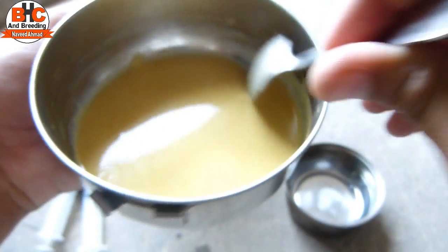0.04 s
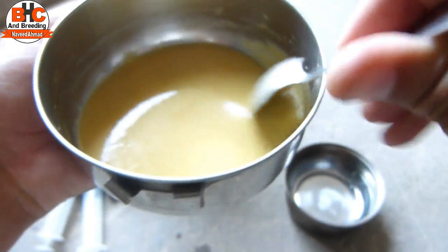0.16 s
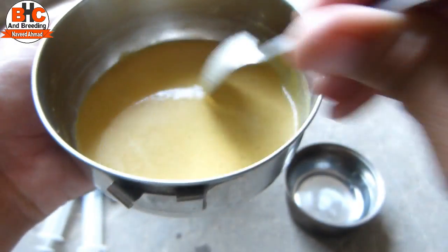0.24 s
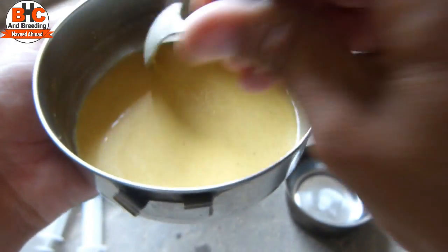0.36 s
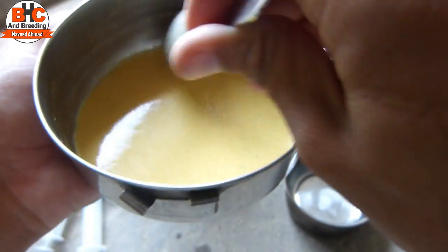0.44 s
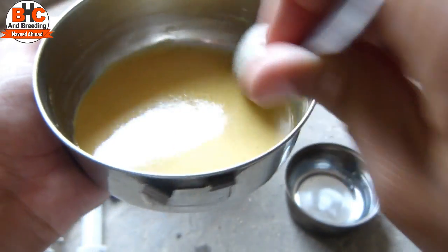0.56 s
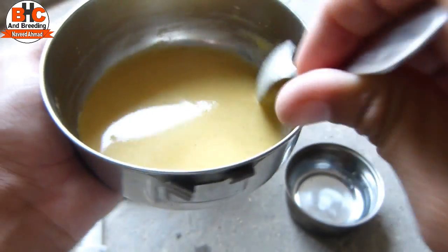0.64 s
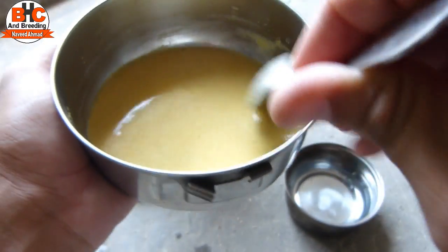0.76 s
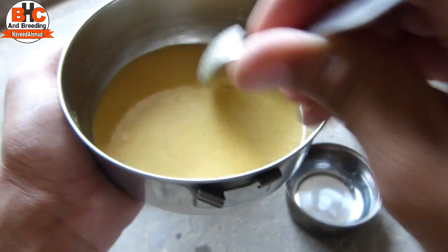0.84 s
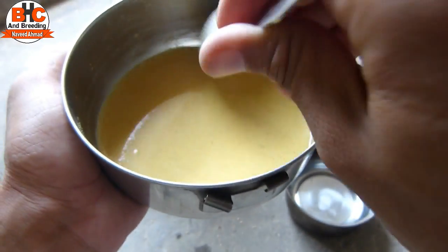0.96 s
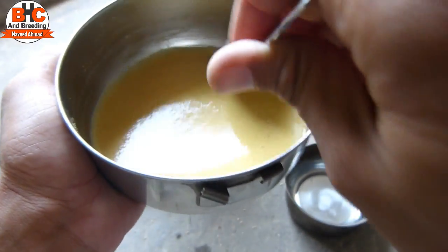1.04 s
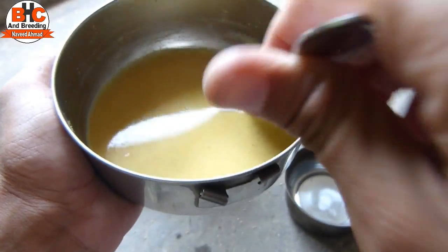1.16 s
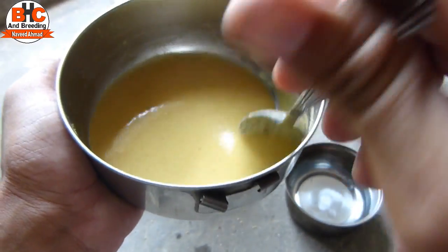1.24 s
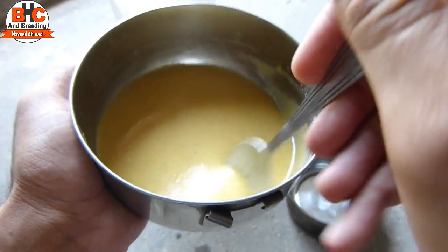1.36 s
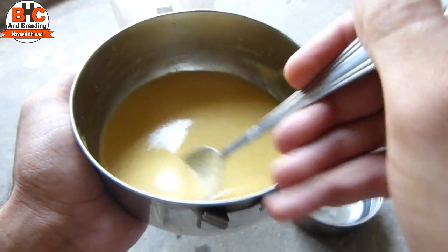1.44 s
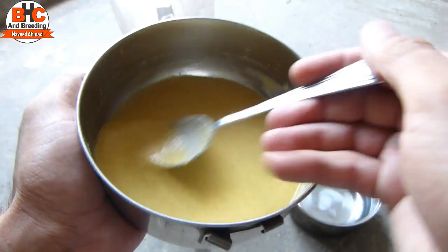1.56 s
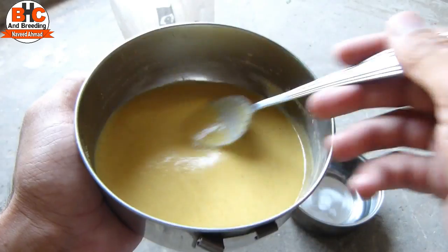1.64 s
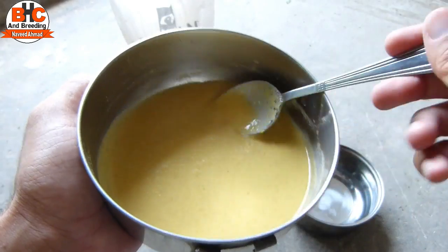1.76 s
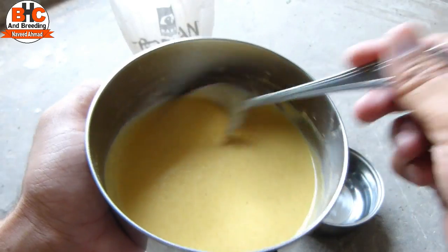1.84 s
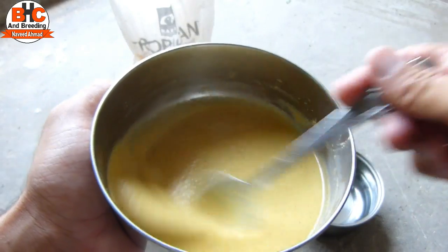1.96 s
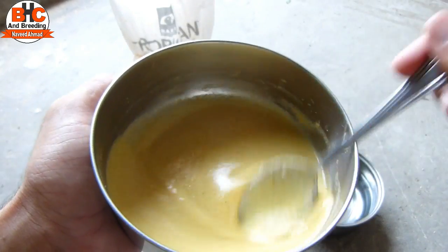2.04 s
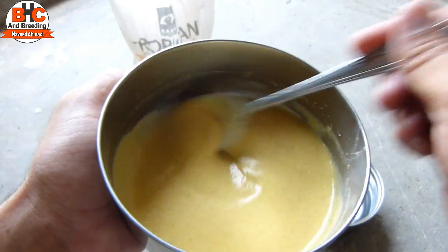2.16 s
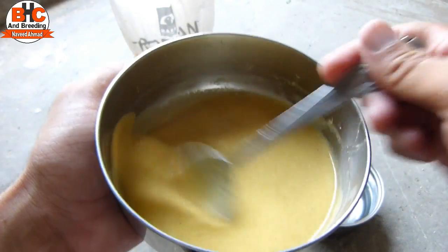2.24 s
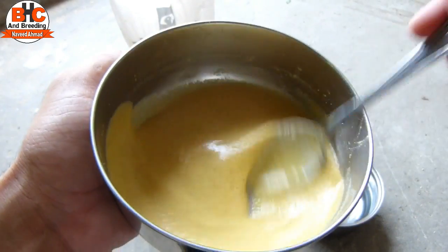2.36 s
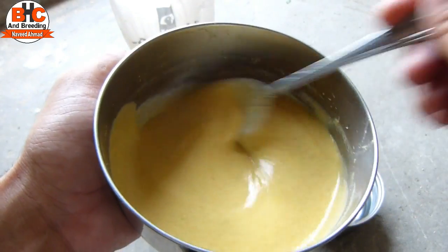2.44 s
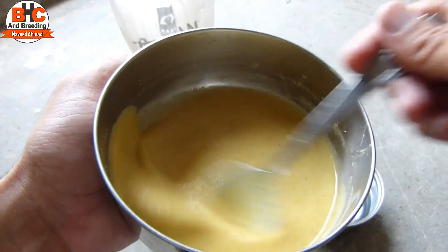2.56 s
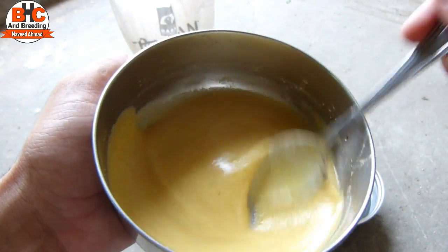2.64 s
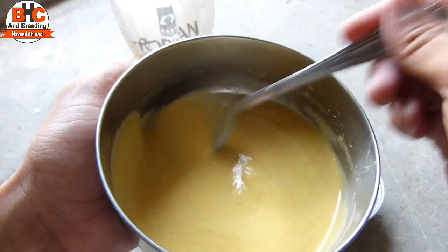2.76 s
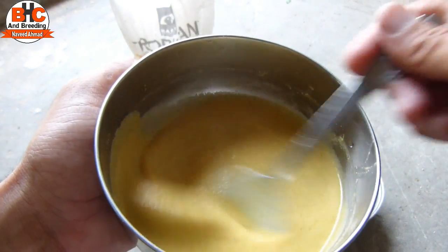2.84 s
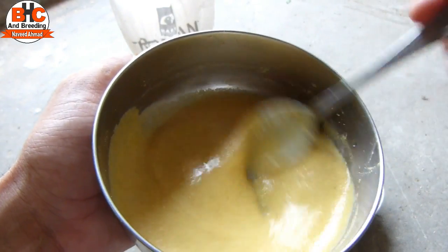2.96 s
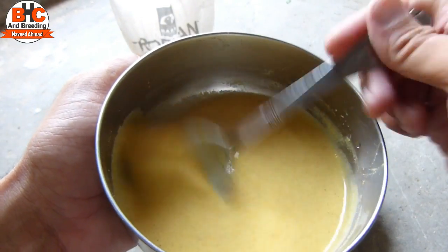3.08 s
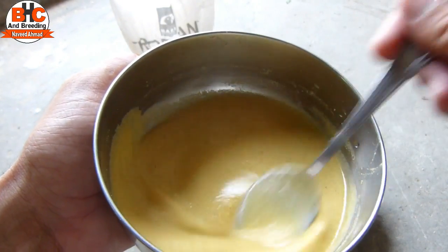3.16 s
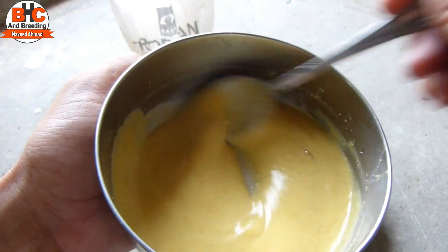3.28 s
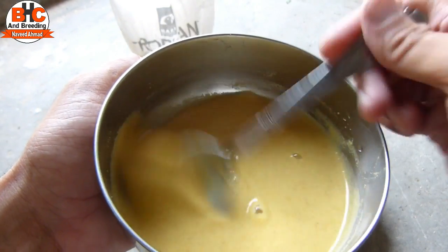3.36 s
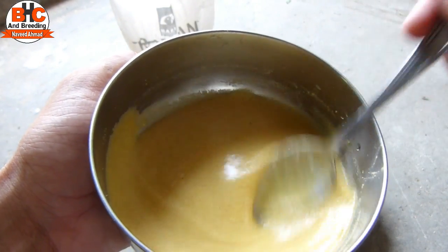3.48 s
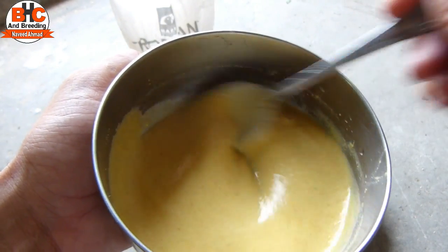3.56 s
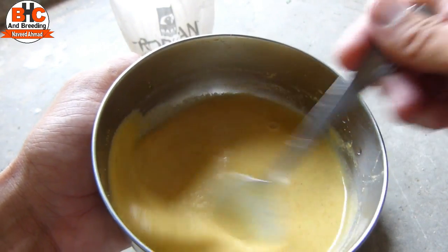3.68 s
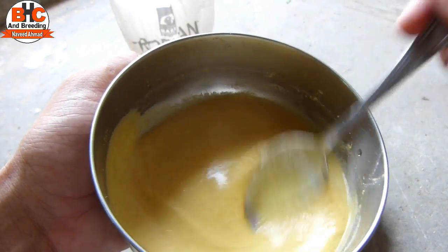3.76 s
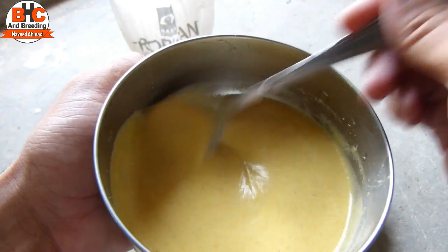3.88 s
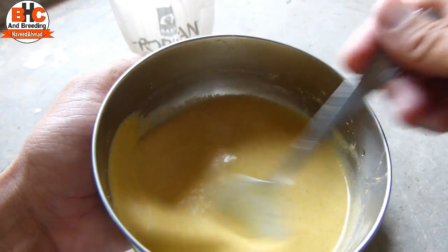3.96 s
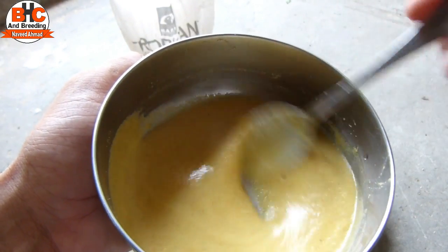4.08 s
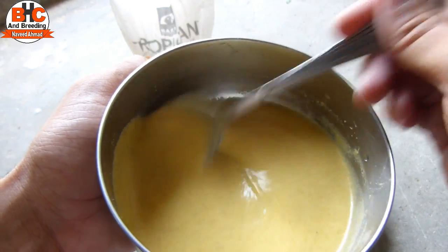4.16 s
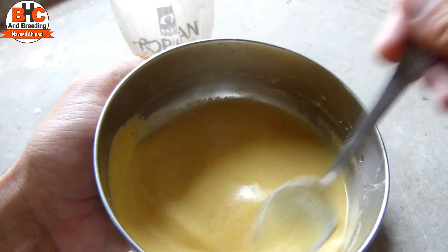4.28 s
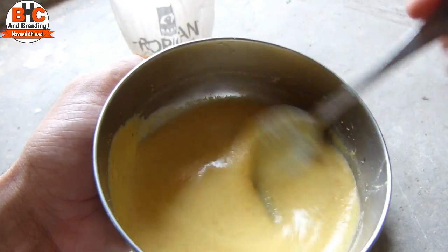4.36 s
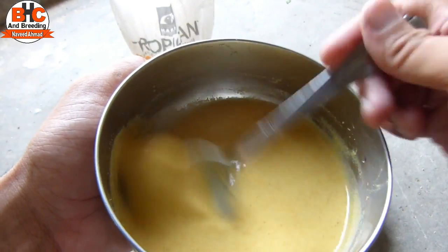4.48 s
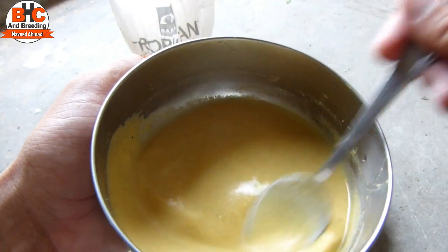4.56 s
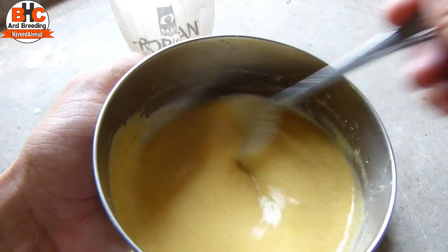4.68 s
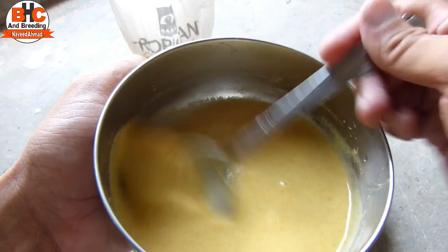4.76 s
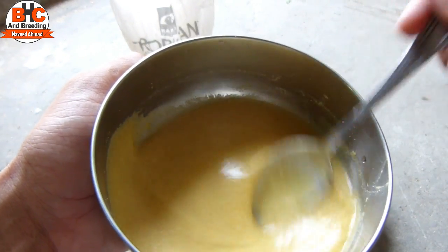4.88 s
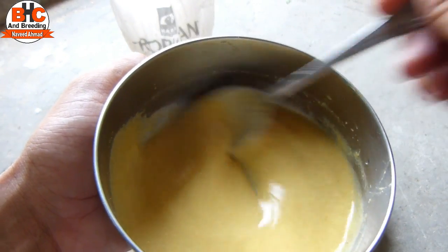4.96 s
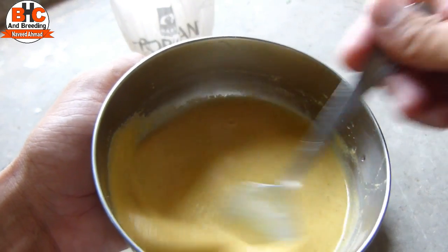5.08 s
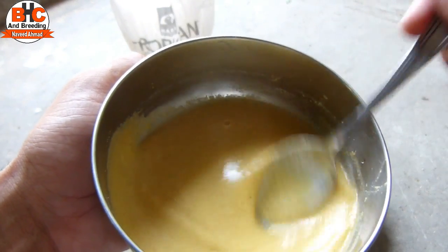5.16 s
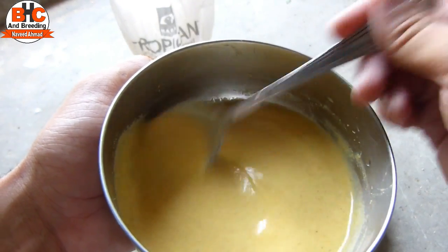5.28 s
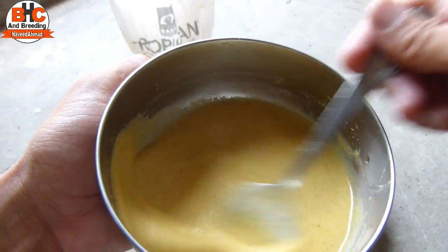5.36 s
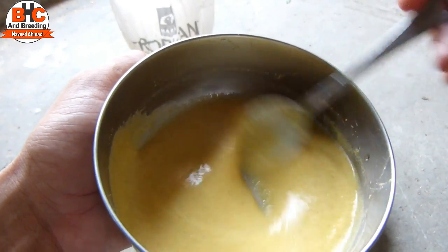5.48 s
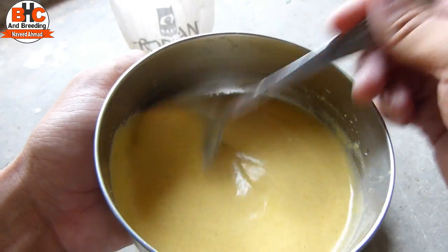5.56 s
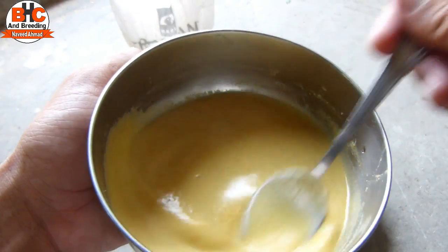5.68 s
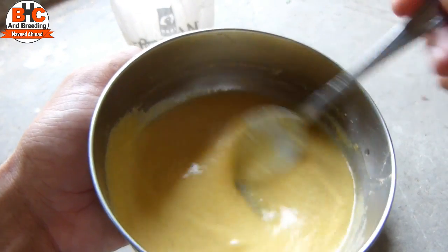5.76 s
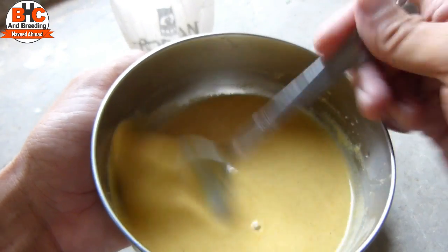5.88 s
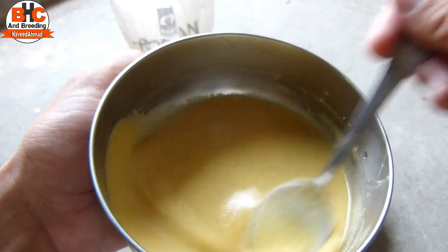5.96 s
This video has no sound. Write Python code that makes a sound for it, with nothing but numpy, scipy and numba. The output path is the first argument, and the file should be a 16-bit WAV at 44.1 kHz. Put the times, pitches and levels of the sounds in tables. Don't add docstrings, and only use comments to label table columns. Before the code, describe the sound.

A close stereo microphone hears a spoon working in a hand-held steel bowl in a small, hard room, over faint rumble and hiss. A weak low drone on the left swells and dies within the first 0.7 s. Until about 1.3 s there are light, thin wipes on the bare wall, with a tap at 0.1, a sharp bright clank at 0.43, small taps near 0.65 and a crisp tick at 0.96. A firmer scrape comes at 1.35, then a near pause. From 1.75 s a tick and ringing knock start the stirring: short gritty sweeps alternate with deeper scrapes over the bottom, mixed with irregular metallic ticks, knocks and clanks, all quickly damped. From 3.2 s it is denser and louder, with heavy scrapes near 3.3, 3.6, 5.3 and 5.8. Tiny wet plops pop through the batter, clearest at 4.66 and 5.54. Stirring continues to the end at 6 s.

```python
import sys
import numpy as np
from scipy import signal
from scipy.fft import rfft, irfft
from scipy.io import wavfile
from scipy.ndimage import uniform_filter1d
from numba import njit

SR = 44100
rng = np.random.default_rng(int(sys.argv[2]) if len(sys.argv) > 2 else 0)


def boost_factor(decibels):
    exponent = np.asarray(decibels, float) / 20
    return 10 ** exponent


def unload_wav(signal):
    wavfile.write(
        sys.argv[1],
        SR,
        np.round(np.clip(np.atleast_2d(signal).T, -1, 1) * 32767).astype(np.int16),
    )


N = 265526
HOP = 32
CHATTERS_PER_S = 100


def held(v):
    return np.repeat(v, HOP)[:N]


def walk(rate):
    hold_hops, count = int(SR / rate / HOP), N // HOP + 1
    steps = np.repeat(rng.standard_normal(count // hold_hops + 1), hold_hops)
    slewed = uniform_filter1d(uniform_filter1d(steps, hold_hops), hold_hops)
    return 1.695 * slewed[:count]


def band(x, low_hz, high_hz):
    sos = signal.butter(2, [low_hz, min(high_hz, .45 * SR)], "band", fs=SR, output="sos")
    return signal.sosfilt(sos, x) / np.sqrt(2 * (high_hz - low_hz) / SR)


@njit
def mode(x, g, k):
    y, b, l = np.empty(len(x)), 0., 0.
    for i in range(len(x)):
        v = (b + g[i] * (x[i] - l)) / (1 + g[i] * (g[i] + k))
        b, l, y[i] = 2 * v - b, l + 2 * g[i] * v, k * v
    return y


def background():
    # (frequency [Hz], density [dB per Hz])
    rumble = [(20, 3), (55, -15), (110, 0), (200, 1.5), (500, -0.5), (1200, -5), (3000, -14), (5000, -9),
              (9000, -36), (16000, -33)]
    level_db = -50
    table_hz, table_db = np.transpose(rumble)
    hz = np.maximum(np.fft.rfftfreq(N, 1 / SR), 1)
    shape = boost_factor(np.interp(np.log(hz), np.log(table_hz), table_db))
    noise = irfft(rfft(rng.standard_normal((2, N))) * shape, N)
    waver_db = 2 * np.array([held(walk(5.2)), held(walk(2.2))])
    mid, side = noise * boost_factor(waver_db)
    pair = np.array([mid + side / 2, mid - side / 2])
    return boost_factor(level_db) * pair / pair.std()


def drone():
    # (time [s], level [dB])
    drone_curve = [
        (0.0, -57),
        (0.154, -47),
        (0.29, -45.5),
        (0.352, -45.5),
        (0.7, -57),
    ]
    s, db = np.transpose(drone_curve)
    gain = boost_factor(np.interp(np.arange(N) / SR, s, db, right=-90))
    left_right = np.array([[1.3], [.6]])
    return gain * band(rng.standard_normal(N), 410, 580) * left_right


def slips():
    slips_per_s, spread_db, smear_db, chatter_db = 3000, 2, 2, 1.3
    when, size = rng.random(N), rng.exponential(size=N)
    sign = rng.choice([-1., 1.], N)
    clicks = (when < slips_per_s / SR) * sign * boost_factor(spread_db * size)
    force = clicks / clicks.std() + boost_factor(smear_db) * rng.standard_normal(N)
    force = force * boost_factor(chatter_db * held(walk(CHATTERS_PER_S)))
    return force / force.std()


def stroke(start, length, db, arch_db, lift_db_per_s):
    press_s = 0.015
    t = np.arange(0, N, HOP) / SR - start
    press = np.clip(t / press_s, 0, 1)
    lean_db = -arch_db * (2 * np.clip(t / length, 0, 1) - 1) ** 2
    lift_db = lift_db_per_s * np.maximum(t - length, 0)
    return (press * boost_factor(db + lean_db - lift_db)) ** 2


def grinding(k):
    # (start [s], length [s], pressure [dB], depth [0 wall - 1 bottom], edge tilt [dB])
    wipes = [(0, 0.057, -37, 1.56, 5.5), (0.102, 0.04, -38, 1.3, -31), (0.133, .12, -41.5, 0.98, -6),
             (0.231, 0.25, -35, 0.37, -9), (.43, 0.095, -40, 0.76, 0.5), (0.582, 0.1, -38.5, 1.43, 9),
             (.8, 0.3, -45, 0.95, -37), (0.956, 0.3, -43.5, 1.33, 12), (1.063, 0.2, -39, 0.29, 9),
             (1.197, 0.11, -36, 0.55, 2), (1.345, 0.17, -29, 0.21, 0.5), (1.751, 0.027, -44, 0.38, 7)]
    sweeps = [(1.805, 0.15, -31.5, .3, 3), (2.045, 0.028, -33.5, 0.46, -4), (2.385, 0.13, -31.5, .4, -4.5),
              (2.575, 0.15, -29, 0.19, 3.5), (2.72, 0.26, -29, 0.061, 1.5), (3.14, .12, -28, 0.079, 4),
              (3.42, 0.074, -35, 0.24, 4), (3.99, .1, -28, 0.11, 7), (4.53, 0.046, -30, 0.16, 3),
              (4.735, 0.022, -26.5, 0.91, -16), (4.86, 0.088, -27, 0.13, -2),
              (5.37, 0.16, -26.5, 0.19, 3.5), (5.69, 0.017, -39, .2, -7), (5.735, 0.055, -31, .3, -23),
              (5.772, 0.042, -21, 0.42, -2)]
    digs = [(2.085, 0.055, -32, 0.72, 5.5), (2.156, 0.13, -28, 0.65, -1.5), (2.45, 0.12, -29, 0.62, 4.5),
            (2.929, 0.083, -35.5, 1, 6), (3.017, 0.13, -28.5, 0.69, 5), (3.275, .14, -24.5, 0.4, 0.7),
            (3.508, 0.095, -30.5, 0.93, -0.5), (3.598, 0.12, -22.5, 0.48, -3), (3.775, 0.078, -25, 0.54, 0),
            (3.86, 0.13, -27.5, 0.63, 4), (4.09, .17, -26, 0.58, -5), (4.358, 0.22, -27, .6, 1.5),
            (4.618, .11, -30, 1, 1.5), (4.77, 0.069, -24, 0.51, 1.5), (4.965, 0.15, -26.5, 0.65, 2.2),
            (5.163, 0.095, -32.5, 1, 4), (5.27, 0.1, -22.5, 0.66, -4), (5.522, 0.15, -24, 0.76, -0.5),
            (5.82, .12, -22, 0.73, -4.5)]
    # share at depth 0 [dB], gain [dB per unit depth]
    wipe_db, wipe_depth_db = (-14, -14, 0.7, -1.1), (3.7, 15.3, .1, 0.093)
    stir_db, stir_depth_db = (-19, -12.5, 0.2, 1), (18, 13, 0.5, -3)
    lift_db_per_s = (350, 323, 246, 368)
    power = 0
    for rows, base_db, depth_db, arch_db in ((wipes, wipe_db, wipe_depth_db, 4),
                                             (sweeps + digs, stir_db, stir_depth_db, 4.5)):
        for s, length, db, depth, tilt_db in rows:
            fed_db = db + base_db[k] + depth * depth_db[k] + tilt_db * (k == 3)
            power = power + stroke(s, length, fed_db, arch_db, lift_db_per_s[k])
    return held(np.sqrt(power))


def knocks(k):
    # (time [s], level [dB], contact [ms])
    tap_rows = [(.019, -35, 4.9), (.1125, -11, 3.8), (.617, -22, 5.3), (.6535, -11.5, 2.6),
                (1.2276, -19.5, 5), (1.5124, -26.5, 4.2)]
    tick_rows = [(.6826, -12.5, 2.2), (.9558, 1, 3.6), (1.1515, -21, 1.1), (1.7444, 1.5, 1.67),
                 (2.0424, -5.5, 4.3), (2.195, -17, 5.6), (2.2114, -12, 4.5), (2.2633, -4, 1.8),
                 (2.387, -20, 5), (2.4114, -13, 6.4), (2.5645, 0, 2.3), (2.6939, -5.5, 5.5),
                 (2.915, -11.5, 4.7), (2.9372, -0.5, 2.4), (3.2254, -11, 18), (3.2464, -7.5, 5.3),
                 (3.5126, -4.5, 4.5), (3.7757, -17, 9), (3.8083, -6.5, 8.6), (4.0905, -3, 1.4),
                 (4.1784, -6, 3.9), (4.28, -16, 6.4), (4.372, -9, 3.9), (4.381, -7, 6.7),
                 (4.7458, -12.5, 6.1), (4.8713, -13.5, 11), (4.9312, -3, 5.3), (5.1767, -1.5, 3.2),
                 (5.631, -5.5, 2.8), (5.7763, -3.5, 1.7)]
    knock_rows = [(1.802, -8.5, 10), (1.8617, -15, 3.3), (2.0872, -14.5, 6.3), (2.1117, -5, 4.2),
                  (2.4856, -14.5, 6.4), (3.1068, -7.5, 2.7), (3.3233, -11, 3.9), (3.5396, -4.5, 3.1),
                  (3.6526, -7.5, 2.4), (3.8873, -1, 3.1), (3.9112, -8, 3.2), (4.1663, -8, 9.2),
                  (4.2229, -2.5, 2.3), (4.4386, -12, 6.6), (4.4653, -2.5, 4), (4.5173, -5, 8),
                  (4.664, -6, 1.8), (4.78, -8.5, 6.1), (4.794, -5.5, 11), (5.009, -9, 14), (5.072, -6, 2.5),
                  (5.56, -8, 2.8), (5.6167, -4.5, 5.3), (5.8513, -9, 3.7), (5.918, 0.5, 2.9)]
    clank_rows = [(.4257, 0, 0.68), (1.9536, -22.5, 6.9), (2.2842, -11, 2.8), (2.973, -4, 2.45),
                  (3.0616, -11.5, 3.2), (3.1187, -7.5, 3), (3.3934, -4.5, 1.3), (3.6069, -4, 1.8),
                  (3.6758, -7.5, 3), (3.955, -8.5, 2.3), (4.1004, -8, 3), (4.2392, -10.5, 2.7),
                  (4.6329, -9.5, 3.3), (5.2138, -8.5, 5.4), (5.2959, -14.5, 6.9), (5.3525, -7, 0.94),
                  (5.494, -3, 1.4), (5.9032, -13, 0.94)]
    kinds = ((tap_rows, (-16, -5.5, -23.5, -10)),
             (tick_rows, (-19, -17, -13.5, -3)),
             (knock_rows, (-20.5, -14.5, -5, -16.5)),
             (clank_rows, (-6.5, -9, -3.5, -6.5)))
    onset_share = .07
    force = np.zeros(N)
    t = np.arange(2000) / SR
    for rows, feed_db in kinds:
        for s, db, ms in rows:
            i, contact_s = int(s * SR), max(ms, 1) / 1000
            onset = 1 - np.exp(-t / (onset_share * contact_s))
            shape = onset * np.exp(-t / contact_s)
            force[i:i + len(t)] += boost_factor(db + feed_db[k]) * shape[:N - i]
    return force


def mode_family(force, modes, rasp, dipped):
    shift_db, fleck_db, shifts_per_s, detune = 4, 4, 12, .018
    sharpest = 32
    film_hz = 400
    gains = []
    for hz, _, bare_db, batter_db in modes:
        level_db = bare_db + dipped * (batter_db - bare_db)
        flicker_db = fleck_db * walk(hz / 70)
        gains.append(boost_factor(level_db + shift_db * walk(shifts_per_s) + flicker_db))
    total = np.sqrt(np.sum(np.square(gains), axis=0))
    low_hz, high_hz, rasp_db = rasp
    out = boost_factor(rasp_db) * band(force, low_hz, high_hz)
    for (hz, width_hz, *_), gain in zip(modes, gains):
        width_hz = max(width_hz, hz / sharpest, (hz / film_hz) ** 2)
        pitch = np.tan(np.pi * hz * (1 + detune * walk(shifts_per_s / 2)) / SR)
        ringing = mode(force * held(gain / total), held(pitch), width_hz / hz)
        out = out + ringing / np.sqrt(np.pi * width_hz / SR)
    return out


def rings():
    # (time [s], frequency [Hz], peak [dB], T60 [s])
    ring_rows = [(.427, 1400, -10.5, 0.02), (.956, 154, -29, 0.018), (1.225, 873, -33.5, 0.13),
                 (1.803, 702, -22, 0.1), (1.803, 2090, -22, 0.11), (2.044, 2150, -16, 0.021),
                 (3.12, 1360, -21, 0.037), (3.394, 2067, -17.5, 0.09), (3.394, 680, -28, 0.14),
                 (3.58, 2100, -27, .04), (4.05, 2220, -23.5, 0.12)]
    out, t = np.zeros(N), np.arange(SR // 5) / SR
    for s, hz, db, t60_s in ring_rows:
        i = int(s * SR)
        decay = np.exp(-np.log(1000) * t / t60_s)
        out[i:i + len(t)] += boost_factor(db) * np.sin(2 * np.pi * hz * t) * decay
    return out


def bowl():
    # (frequency [Hz], width [Hz], level on bare wall [dB], level in batter [dB])
    belly_modes = [(647, 200, 5, -9), (760, 95, -25, 3), (963.6, 52, 5, 19.5), (1017, 91, 3, 1.5)]
    wall_modes = [(1400, 40, -24.5, -7), (1521, 35, -30, 10.5), (1634.4, 71, 13.5, 14.5),
                  (1940, 96, 18, -43), (2133, 30, 10.5, 9.5), (2297, 245, 6, 11), (2620, 400, 11, 9),
                  (2824, 46, 6.5, 6.5), (3107, 160, 3, 13.5)]
    edge_modes = [(3500, 710, -15, -32), (4046, 180, 8.5, 4.5), (4178, 50, -22, 7.5), (4733, 270, -12, 4.5),
                  (4980, 340, 7.5, -7), (5560, 480, 0.5, 0.5), (5368, 260, -24, 11), (6150, 160, -24, -1),
                  (6452, 1300, 6, 7.5)]
    sizzle_modes = [(7100, 1100, 4, 8), (7730, 190, -3, 4), (7640, 120, -4, -11), (8350, 120, 12.5, 1.5),
                    (9370, 510, -32, -0.5), (10100, 200, -12, -13), (10850, 150, 8, -1),
                    (12800, 760, -3, -20)]
    # (low [Hz], high [Hz], level beside the modes [dB])
    rasps = [(700, 2100, -36), (1250, 5500, -14.5), (3860, 5800, -20.5), (5940, 9800, -15.5)]
    dip_s, dip_length_s, own_chatter_db = 1.33, 0.017, 1.9
    lowest_hz = 641
    thud_db, thud_hz = -18.5, (163, 570)
    jolt_db, jolt_hz = -35, (35, 223)

    grit, rattle = slips(), rng.standard_normal(N)
    dipped = np.clip((np.arange(0, N, HOP) / SR - dip_s) / dip_length_s, 0, 1)
    forces, steel = [], 0
    for k, modes in enumerate((belly_modes, wall_modes, edge_modes, sizzle_modes)):
        own_chatter = boost_factor(own_chatter_db * held(walk(CHATTERS_PER_S / 2)))
        force = grit * grinding(k) * own_chatter + rattle * knocks(k)
        steel = steel + mode_family(force, modes, rasps[k], dipped)
        forces.append(force)
    steel = signal.sosfilt(signal.butter(6, lowest_hz, "high", fs=SR, output="sos"), steel)
    thud = boost_factor(thud_db) * band(forces[0], *thud_hz)
    jolt = boost_factor(jolt_db) * band(forces[2], *jolt_hz)
    return steel + thud + jolt + rings()


def batter():
    # (time [s], start [Hz], end [Hz], length [s], level [dB])
    plops = [
        (1.225, 1120, 1250, 0.015, -31),
        (2.421, 902, 760, 0.049, -31),
        (2.85, 1130, 1400, 0.01, -24),
        (2.975, 1250, 1500, 0.015, -24),
        (4.66, 1142, 1400, 0.012, -15),
        (5.08, 1097, 1290, 0.04, -28.5),
        (5.225, 912, 690, 0.104, -26.5),
        (5.54, 845, 1860, 0.029, -16.5),
        (5.81, 822, 700, 0.086, -25.5),
    ]
    out = np.zeros(N)
    for s, start_hz, end_hz, length_s, db in plops:
        i = int(s * SR)
        u = np.arange(int(length_s * SR)) / (length_s * SR)
        hz = start_hz * (end_hz / start_hz) ** u
        tone = np.sin(2 * np.pi * np.cumsum(hz) / SR)
        out[i:i + len(u)] += boost_factor(db) * 3 * tone * np.sqrt(u) * (1 - u) ** 2
    return out


def tail(t60_s, top_hz):
    t = np.arange(int(.6 * SR)) / SR
    h = rng.standard_normal((2, len(t))) * np.exp(-np.log(1000) * t / t60_s)
    h = signal.lfilter([1], [1, -np.exp(-2 * np.pi * top_hz / SR)], h)
    return h / np.sqrt(np.sum(h ** 2, axis=1, keepdims=True))


def scene():
    side_db, left_db, hands_per_s = -11.5, 0.8, 8
    room_t60_s, room_db, room_top_hz = 0.3, -10.5, 8900
    steel = bowl() + batter()
    bright = signal.lfilter([1, -.4], 1, steel)
    near = signal.fftconvolve(bright[None], tail(0.0057, 22000), axes=1)[:, :N]
    turn = held(np.pi * walk(hands_per_s))
    side = boost_factor(side_db) * (near[0] * np.cos(turn) + near[1] * np.sin(turn))
    room = signal.fftconvolve(steel[None], tail(room_t60_s, room_top_hz), axes=1)[:, :N]
    ports = np.array([[1], [-1]])
    direct = (steel + side * ports) * boost_factor(left_db * ports / 2)
    return direct + boost_factor(room_db) * room + background() + drone()


def low_pass(x):
    return signal.sosfilt(signal.butter(12, 16840, fs=SR, output="sos"), x)


def record(dry):
    top_hz, offset = 13500, -0.0031
    heard = signal.sosfilt(signal.butter(6, top_hz, fs=SR, output="sos"), dry)
    return low_pass(np.tanh(0.96 * heard) / 1.151 + offset)


dry = scene()
out = record(dry)
unload_wav(out)
```